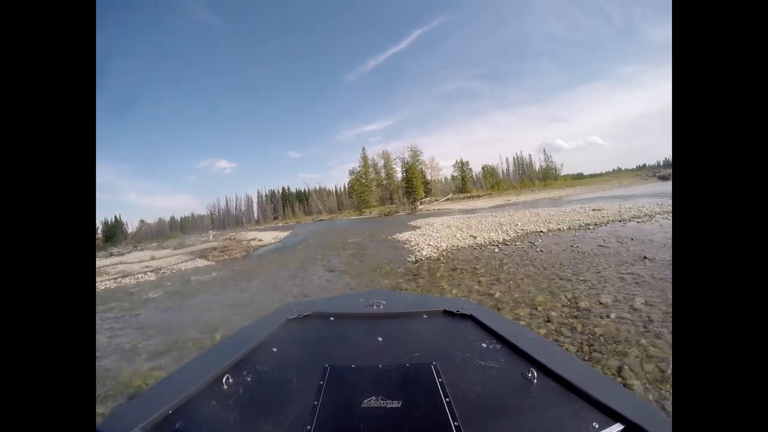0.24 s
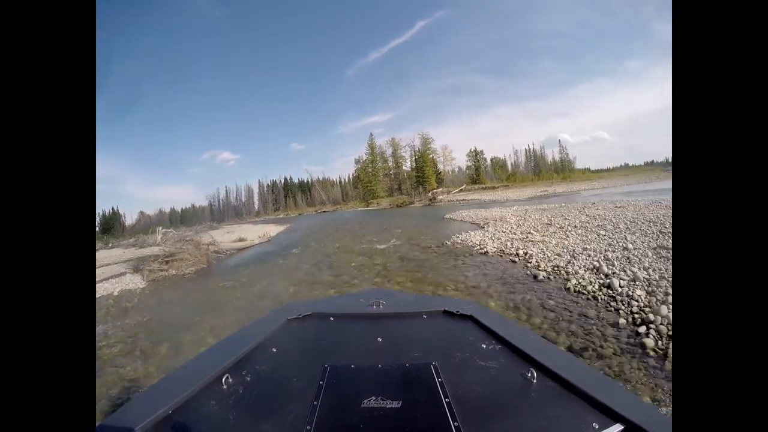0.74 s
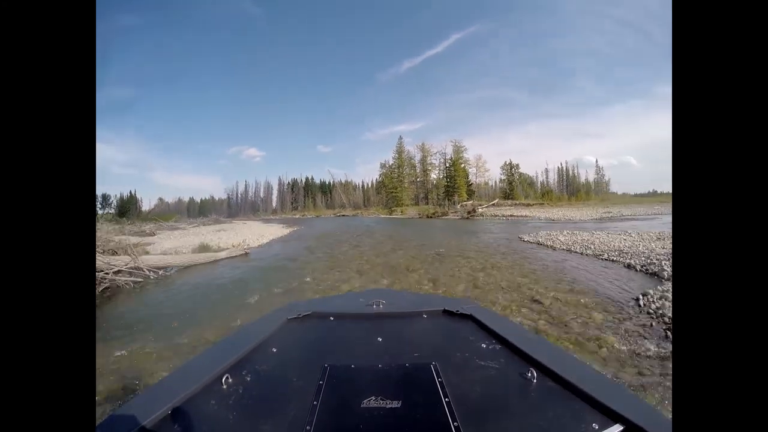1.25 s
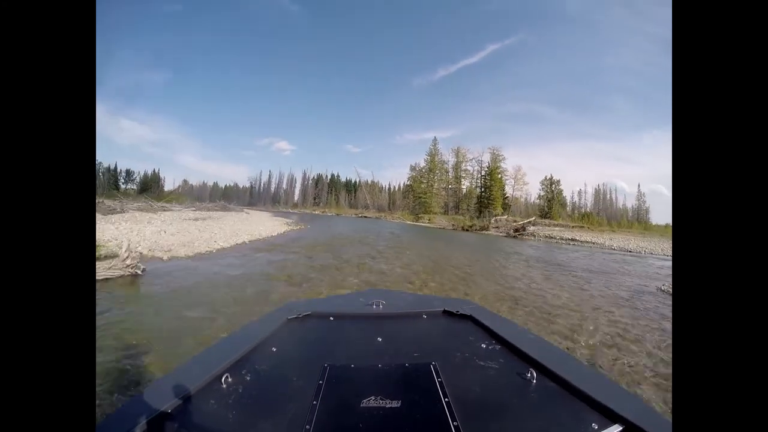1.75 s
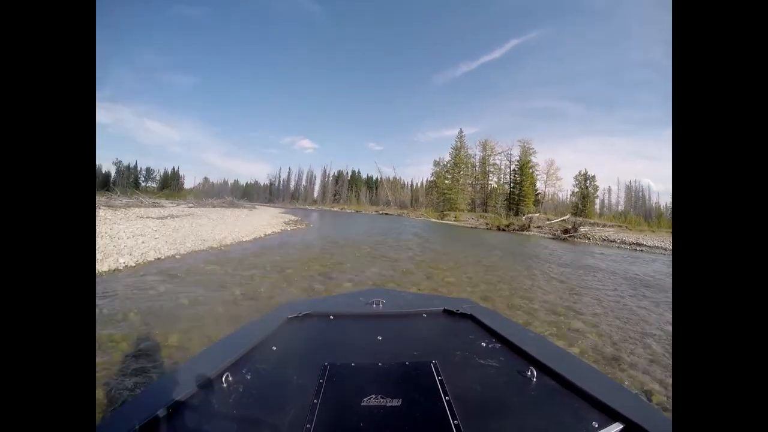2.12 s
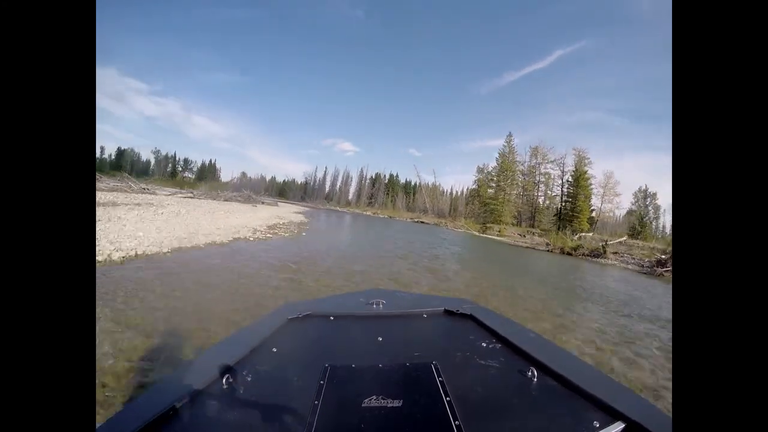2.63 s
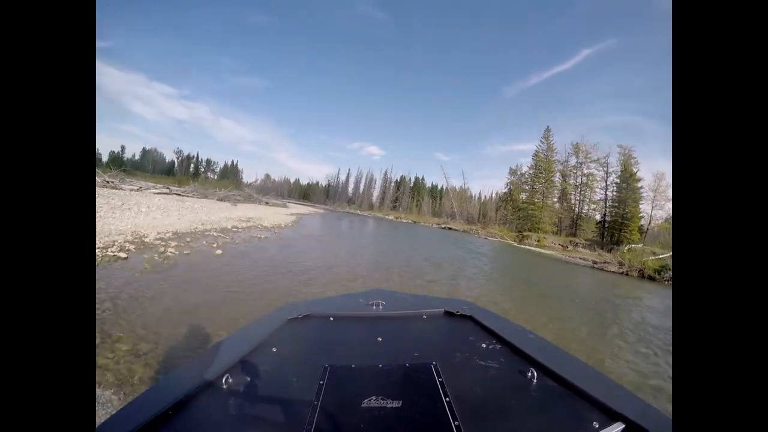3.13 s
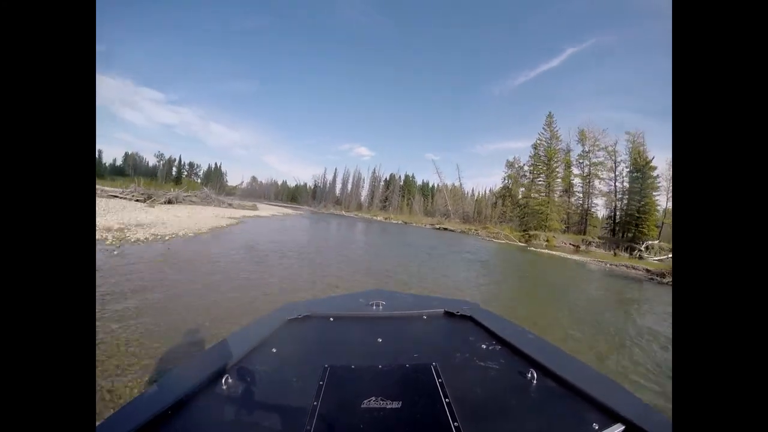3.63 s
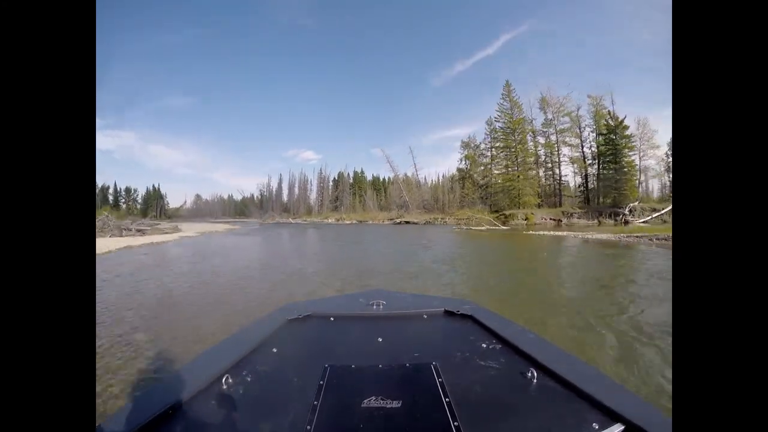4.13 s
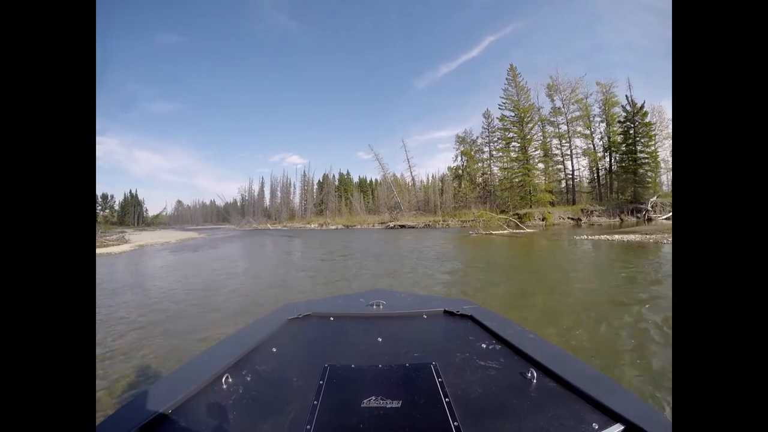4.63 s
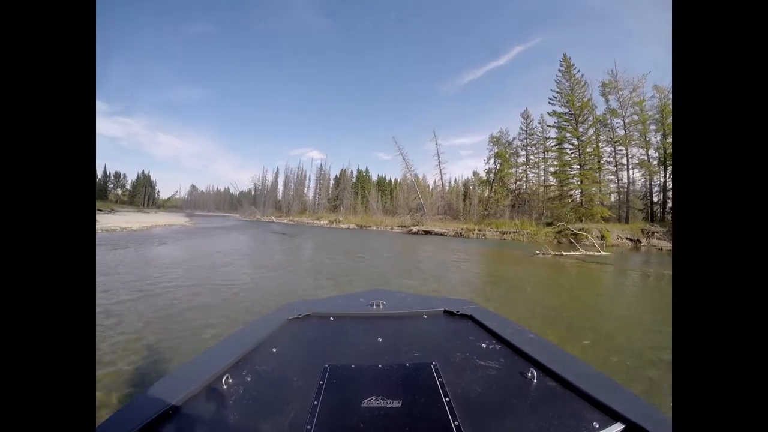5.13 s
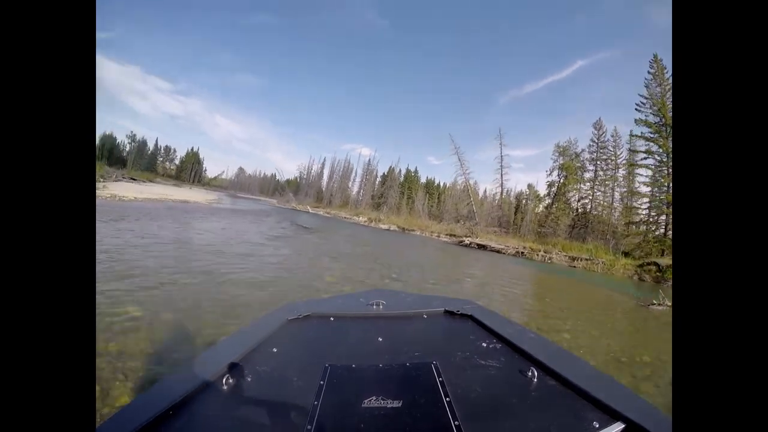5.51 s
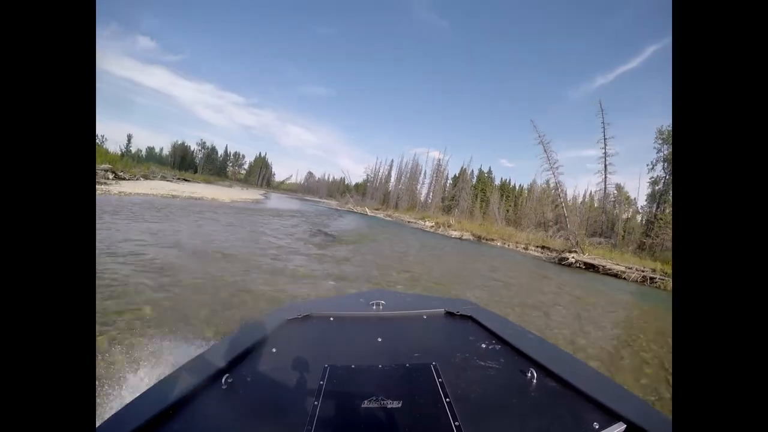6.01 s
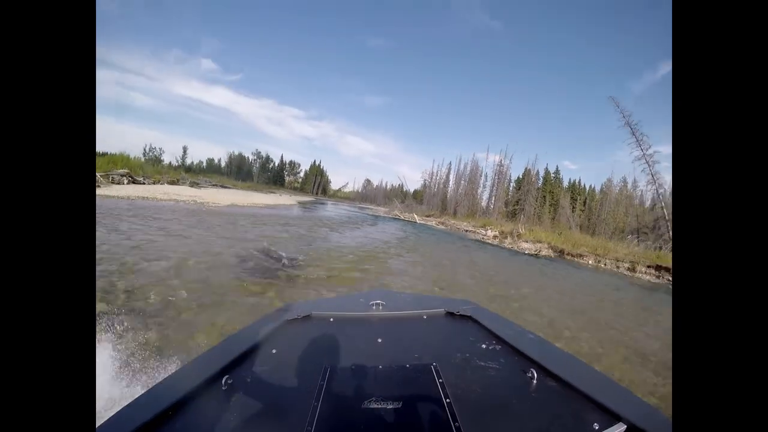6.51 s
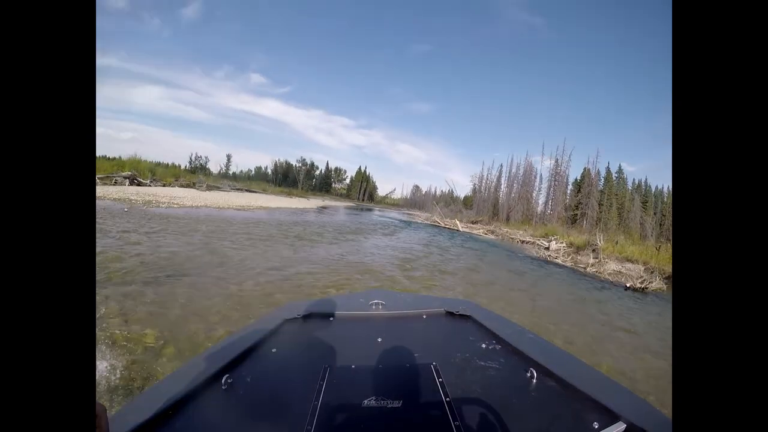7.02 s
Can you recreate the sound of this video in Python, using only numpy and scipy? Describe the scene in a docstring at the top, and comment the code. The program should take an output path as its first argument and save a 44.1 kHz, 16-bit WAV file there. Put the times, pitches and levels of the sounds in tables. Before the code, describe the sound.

A microphone riding in the boat, exposed to wind, hears a hard-working supercharged engine: booming exhaust, gritty mid-range growl and faint high whine. The pitch swoops down and up repeatedly with the throttle, turning rough and gurgling when slow, with short throaty gulps. Dull hull thumps cluster early, a sharp slap bursts into spray, and steady water rush and low fluttering air continue throughout.

```python
"""Seven seconds aboard a small jet boat running up a shallow river, its three-cylinder engine supercharged.
It opens fast, with the exhaust orders booming in the hull, cycle-locked knocks and pulsed gas noise snarling
in the engine bay, and blade tones whining. The revs sink twice by 1.4 s while waves ring the hull, then climb;
the hardest slap and splash come just before 2 s. They drop again near 4 and 4.8 s as swept sines gulp, peak
near 5.8 s, dip and recover. Noise makes the rush and spray, and loose low eddies the buffeting, throughout."""
import sys
import numpy as np
from scipy import signal
from scipy.fft import rfft, irfft, next_fast_len
from scipy.io import wavfile
from scipy.ndimage import uniform_filter1d, minimum_filter1d

SR = 44100
rng = np.random.default_rng(int(sys.argv[2]) if len(sys.argv) > 2 else 0)


def waveform_to_disk(signal):
    """Save audio, clipped to [-1, 1], as 16-bit WAV at the path in sys.argv[1]."""
    frames = np.transpose(np.atleast_2d(signal))
    scaled = np.clip(frames, -1, 1) * 32767
    samples = np.round(scaled).astype(np.int16)
    wavfile.write(sys.argv[1], SR, samples)


N = 320607
TIME = np.arange(N) / SR


def undb(db):
    """Decibels to gain."""
    return np.exp(np.asarray(db) * (np.log(10) / 20))


def unit(x):
    """Scale to rms 1."""
    return x / np.sqrt(np.mean(x ** 2))


def curves(table):
    """Each column after the time as a value per sample."""
    times, *columns = np.transpose(table)
    return [np.interp(TIME, times, column) for column in columns]


def response(hz, points):
    """Gain of a colour at the given frequencies, read on a log-frequency scale."""
    point_hz, db = np.transpose(points)
    return undb(np.interp(np.log(np.maximum(hz, 1)), np.log(point_hz), db))


def colour(x, points):
    """Filter a sound by a colour; rms 1."""
    size = next_fast_len(len(x) + 4096)
    bin_hz = np.arange(size // 2 + 1) * SR / size
    filtered = irfft(rfft(x, size) * response(bin_hz, points), size)
    return unit(filtered[:len(x)])


def noise():
    """White noise for the whole scene."""
    return rng.standard_normal(N)


def walk(rate):
    """Smooth chance with spread 1 that changes rate times a second, repeating after 4096 steps."""
    levels = np.resize(rng.standard_normal(4096), int(TIME[-1] * rate) + 2)
    place = TIME * rate
    k = place.astype(int)
    # an equal-power turn from one level to the next keeps the spread constant
    turn = (np.pi / 2 * (place - k)).astype(np.float32)
    return levels[k] * np.cos(turn) + levels[k + 1] * np.sin(turn)


def add(out, s, sound, db):
    """Put a sound in at time s with the given peak level."""
    i = int(s * SR)
    out[i:i + len(sound)] += (undb(db) * sound / np.abs(sound).max())[:N - i]


# exhaust orders before the hull colours them: (multiple of cycle rate, level [dB])
EXHAUST_ORDERS = [(2, 1.5), (3, -1.5), (4, -2), (5, -15), (6, -9.5), (7, -22.5), (8, -15), (9, -12)]
# the hull's boom resonance: (frequency [Hz], level [dB])
BOOM_COLOUR = [(20, -55.5), (50, -32), (80, -20.5), (110, -11), (135, 1), (152, 5.5), (175, -7),
               (205, -3.5), (235, -12.5), (290, -14.5), (350, -39), (600, -62), (3000, -100)]
# exhaust boom at cruising speed: (time [s], level [dB])
BOOM_LEVEL = [(0.0, -18.5), (0.52, -18.5), (0.94, -12.5), (1.13, -25), (1.22, -15.5), (2.18, -20.5),
              (3.35, -13.0), (3.46, -24), (3.82, -13), (3.9, -18), (4.07, -12.5), (4.34, -16), (4.5, -7),
              (4.59, -15.5), (4.95, -19.5), (5.04, -9), (5.15, -16), (5.76, -10.5), (6.21, -19), (6.42, -9),
              (6.65, -19.5), (7.26, -16.5)]
BOOM_OCTAVE_DB = 5.5  # dB per octave of engine speed


def exhaust(hz, phase, rough, octaves, flutter_rate=40, burble_db=-7, throb_db=1, heave_db=0.2, focus=1.077):
    """Low engine orders sweep through the hull's boom; churning water shakes each one and adds a burble."""
    note, power = 0, 0
    steady = np.sqrt(2 * (1 - rough ** 2))
    for order, db in EXHAUST_ORDERS:
        # focus steepens the boom, so the order nearest the resonance dominates
        size = undb(db) * response(order * hz, BOOM_COLOUR) ** focus
        angle = order * phase + rng.uniform(0, 2 * np.pi)
        in_step = steady + rough * walk(flutter_rate)
        across = rough * walk(flutter_rate)
        note = note + size * (in_step * np.cos(angle) + across * np.sin(angle))
        power = power + size ** 2
    burble = undb(burble_db) * rough * colour(noise(), BOOM_COLOUR)
    note = note / np.sqrt(power) + burble
    # the orders trade energy while the total throbs, and heaves with the churning water
    smooth_power = uniform_filter1d(uniform_filter1d(note ** 2, size=3000), size=2000)
    throb = undb(throb_db * walk(45) + heave_db * rough * walk(14))
    level = undb(curves(BOOM_LEVEL)[0] + BOOM_OCTAVE_DB * octaves)
    return note / np.sqrt(smooth_power) * throb * level


# engine bay's low resonances: (frequency [Hz], level [dB])
BAY_COLOUR = [(100, -49), (250, -8.5), (350, -24), (465, -11), (510, -11), (585, -7.5), (640, -11.5),
              (740, -10), (800, -4), (855, 3.5), (930, -0.5), (1020, -3), (1080, -6.5), (1137, -3.5),
              (1270, -13), (1440, -24), (2000, -27.5), (6000, -95.5)]
# engine's biting upper resonances: (frequency [Hz], level [dB])
BITE_COLOUR = [(1100, -35), (1440, -20), (1580, -1), (1690, -7), (1810, 2.5), (1895, 4), (1970, -7),
               (2060, -17), (2250, -15), (2700, -22), (3050, -28.5), (4500, -54.5), (9000, -81)]


def snarl(phase, rough, drift_rate=9, gas_db=-1, churn_db=7, pulsing=0.31, throb_db=1.14,
          stagger=0.021, firing_db=2, count=72):
    """Knocks that repeat every cycle, a little early or late, and gas noise pulsed by the three firings."""
    size = 2048  # points in one engine cycle
    place = (phase + stagger * walk(40)) / (2 * np.pi) * size
    k = np.arange(count)
    # orders start at the sixth; every third is a multiple of the firing rate
    order_sizes = (k > 5) * undb(firing_db * (k % 3 == 0))
    knocks, power = 0, 0
    # one fixed pattern and three drifting ones: the cycle slowly changes shape
    for weight in (1, walk(drift_rate), walk(drift_rate), walk(drift_rate)):
        orders = order_sizes * np.exp(2j * np.pi * rng.random(count))
        cycle = irfft(orders, size)
        knocks = knocks + weight * np.interp(place % size, np.arange(size), cycle)
        power = power + weight ** 2
    knocks = knocks / np.sqrt(power)
    gas = noise() * (1 + pulsing * np.cos(3 * phase))
    gas_share = undb(gas_db + churn_db * (rough - .5))
    throb = undb(throb_db * walk(70)) / np.hypot(1, gas_share)
    bay, bite = [unit((colour(knocks, points) + gas_share * colour(gas, points)) * throb)
                 for points in (BAY_COLOUR, BITE_COLOUR)]
    return bay, bite


# whine by pitch, before trims and flares: (tone [Hz], level [dB], smear [0-1])
WHINE_BY_PITCH = [(3800, -66, 1), (4940, -61.5, .95), (5900, -54.5, 1), (7100, -52.5, .95),
                  (7900, -50, 0.99), (7930, -48, 1), (8560, -57.5, 0.4), (9900, -63.5, 0.2),
                  (14000, -65, 0.95)]
# the treble comes through the housing unevenly: (frequency [Hz], level [dB])
HOUSING_COLOUR = [(5000, 0), (5600, -4.5), (6300, -6), (6880, 8), (7200, 0.5), (7550, 5.5), (7800, -5.5),
                  (8100, 0.5), (8500, -8.5), (9000, -2), (10000, -4)]
WHINE_ORDER = 173  # blade tone as a multiple of the cycle rate
WHINE_REV_DB = 2.3  # dB per octave a second of revving up
FLARE_DB, FLARE_SMEAR = 1, .15  # dB and added smear per octave a second of slowing


def supercharger(hz, phase, revving, wobble_rate=700, wobble=.024, rock=0.02, flutter_db=1.0,
                 tone_db=-5.0, octave_db=-21):
    """Impeller blades whine with a faint octave; twist in the drive smears the tone, more so on slowing."""
    table_hz, levels, smears = np.transpose(WHINE_BY_PITCH)
    tone_hz = WHINE_ORDER * hz
    slowing = np.maximum(-revving, 0)
    smear = np.interp(tone_hz, table_hz, smears) + FLARE_SMEAR * slowing
    twist = wobble * walk(wobble_rate) + rock * np.sin(3 * phase)
    angle = 2 * np.pi * np.cumsum(tone_hz * (1 + smear * twist)) / SR
    whine = 0
    for k, db in ((1, tone_db), (2, octave_db)):
        tone = np.sin(k * angle) * (1 + 0.24 * walk(300)) * undb(flutter_db * walk(32))
        level_db = db + np.interp(k * tone_hz, table_hz, levels)
        whine = whine + colour(tone, HOUSING_COLOUR) * undb(level_db)
    return whine * undb(WHINE_REV_DB * np.maximum(revving, 0) + FLARE_DB * slowing)


# the exhaust gulps as its outlet comes clear of the water:
# (middle time [s], middle pitch [Hz], peak level [dB], length [s])
GULPS = [(.68, 228, -24, 0.12), (4.044, 250, -22, 0.066), (4.118, 268, -19.5, .11),
         (4.556, 266.6, -25, 0.084), (4.82, 282.3, -25.5, .1), (5.272, 266.7, -24.5, 0.22)]


def gulps(rise=0.2):
    """Short throaty swells: sines under a half-sine envelope that rise a little and waver in pitch."""
    out = np.zeros(N)
    for s, hz, db, length in GULPS:
        u = np.linspace(0, 1, int(length * SR))
        pitch = hz * (1 + rise * (u - .5) + 0.039 * walk(87.0)[:len(u)])
        swell = np.sin(np.pi * u) * np.sin(2 * np.pi * np.cumsum(pitch) / SR)
        add(out, s - length / 2, swell, db)
    return out


# waves thump the hull bottom: (time [s], peak level [dB])
THUMPS = [(0.601, -9.5), (.8, -3.5), (0.965, -5.5), (1.227, -11), (1.418, -13), (1.527, -4.5), (1.72, -11),
          (1.95, -5), (2.516, -8), (3.325, -6.5), (4.26, -7), (6.602, -4), (6.803, -5.5)]
# sharp slaps on the hull plates: (time [s], peak level [dB], 60 dB decay [s])
SLAPS = [(.72, -20, 0.035), (1.419, -17, 0.095), (1.53, -15, 0.12), (1.924, 2.5, 0.12),
         (1.953, -11.5, 0.085), (3.579, -12.5, .04), (4.263, -13, 0.027), (6.589, -9.5, .08)]
# hull modes: (frequency [Hz], level [dB], 60 dB decay [s])
HULL_MODES = [(129, -18, 0.29), (140.9, 2.5, 0.21), (163, -1.5, 0.02), (260, -33, 0.035)]
# rattle of the hull plates: (frequency [Hz], level [dB])
PLATE_COLOUR = [(30, -36.5), (100, 12), (270, 4), (370, -9), (520, 6), (640, -4.5), (760, 7.5), (900, 7),
                (1100, 0.5), (1350, -12.5), (2000, -11), (2600, -25.5), (3300, -23.5), (5000, -43.5),
                (12000, -79.5)]


def hull(rise_s=0.0069, contact_s=0.0004):
    """Soft blows ring the hull's low modes; hard slaps rattle its plates."""
    out = np.zeros(N)
    t = TIME[:SR // 3]
    ring = sum(undb(db - 60 * t / t60) * np.sin(2 * np.pi * f * t) for f, db, t60 in HULL_MODES)
    thump = -ring * (1 - np.exp(-t / rise_s))
    for s, db in THUMPS:
        add(out, s, thump, db)
    for s, db, t60 in SLAPS:
        rattle = colour(rng.standard_normal(len(t)), PLATE_COLOUR)
        # the plates share out the blow's energy
        rattle = rattle / np.sqrt(uniform_filter1d(rattle ** 2, size=700))
        add(out, s, rattle * (1 - np.exp(-t / contact_s)) * undb(-60 * t / t60), db)
    return out


# water rushing along the hull: (frequency [Hz], level [dB])
RUSH_COLOUR = [(40, -26), (100, -12.5), (600, 2.5), (1500, -2), (2080, -5), (2300, -1.5), (2700, -3.5),
               (3050, 5), (3300, -0.5), (3600, 1.5), (3900, -6.5), (4090, -2.5), (4300, -10.5), (4550, -9),
               (4800, -16.5), (5200, -16.5), (5600, -20.5), (6200, -17), (6850, -17), (7300, -20),
               (7950, -23), (8600, -32), (15000, -47)]
# the rush swells, or once dips, as the hull digs in:
# (middle time [s], half length [s], level over the rush [dB])
SURGES = [(0.437, 0.08, 6), (4.034, .06, 7), (4.42, 0.078, -2.5), (5.14, 0.076, 4)]
# fine drops: (frequency [Hz], level [dB])
SPRAY_COLOUR = [(2000, -18), (5000, 1), (7500, 7), (9000, -6), (10700, 1.5), (12000, -5.5), (13500, 1),
                (15000, -8.5)]
# fine spray before the drops_db lift: (time [s], level [dB])
SPRAY_LEVEL = [(0.1, -69.5), (1.37, -69.5), (1.45, -64), (1.75, -77), (2.47, -63), (2.73, -67.5),
               (4.56, -73), (4.77, -79), (5.28, -71), (6.13, -70), (6.52, -65), (7.15, -67)]
# sheets of spray thrown up by the hull: (time [s], level over the fine spray [dB])
SPLASHES = [(.86, 4), (1.43, 2), (1.965, 9), (2.05, 3), (2.86, 1), (6.77, 4)]
SPLASH_S = .06  # time constant of a splash's fading dB lift


def water(rush_db, flicker_db=1.16, drops_db=5, patter_db=1):
    """A rush of noise along the hull, and sparse random drops of spray that leap with each splash."""
    surge_db = sum(db * np.exp(-((TIME - s) / half) ** 2) for s, half, db in SURGES)
    rush = colour(noise(), RUSH_COLOUR) * undb(rush_db + surge_db + flicker_db * walk(22))
    splash_db = sum(db * (TIME > s) * np.exp(-np.abs(TIME - s) / SPLASH_S) for s, db in SPLASHES)
    drops = noise() * (rng.random(N) < .2) * rng.rayleigh(size=N)
    spray_db = curves(SPRAY_LEVEL)[0] + splash_db + drops_db + patter_db * walk(48)
    return rush + colour(drops, SPRAY_COLOUR) * undb(spray_db)


# turbulence in the air stream: (frequency [Hz], level [dB])
BUFFET_COLOUR = [(3, -65), (10, -27.5), (18, -16.5), (26, -7.5), (33, -6.5), (45, -17.5), (65, -22.5),
                 (120, -37), (400, -91.5), (2000, -120)]
# buffeting air before its quick gusts: (time [s], level [dB])
WIND_LEVEL = [(0.0, -20), (0.9, -14.5), (0.96, -25), (1.48, -16.5), (1.78, -27), (1.88, -14.5), (2.36, -16),
              (2.5, -25.5), (2.88, -14), (2.98, -24), (4.22, -18.5), (4.38, -29.5), (4.82, -32),
              (4.92, -19), (6.26, -33), (6.78, -13.5), (7.06, -27), (7.26, -16)]


def wind(shed_hz=26.07, wander=0.093, turbulence_db=-6, gust_db=2):
    """Eddies shed at a loose rate thud close by amid broader turbulence, in quick gusts."""
    eddies = np.sin(2 * np.pi * np.cumsum(shed_hz * (1 + wander * walk(11))) / SR)
    turbulence = undb(turbulence_db) * colour(noise(), BUFFET_COLOUR)
    return unit(unit(eddies) + turbulence) * undb(curves(WIND_LEVEL)[0] + gust_db * walk(9))


# engine speed before smoothing: (time [s], four-stroke cycle rate [Hz])
SPEED = [(0.0, 57.74), (0.32, 55.42), (0.47, 36.4), (0.57, 30.33), (0.67, 28.13), (0.87, 38.3),
         (1.01, 40.59), (1.17, 28.2), (1.36, 21.7), (1.52, 23.83), (1.66, 28.99), (2.09, 38.29),
         (2.76, 44.74), (2.91, 41.34), (3.36, 38.25), (3.64, 45.88), (3.87, 33.12), (4.02, 28.08),
         (4.14, 31.33), (4.4, 47.03), (4.52, 46.1), (4.77, 31.69), (4.88, 31.57), (5.24, 44.28),
         (5.77, 51.63), (6.12, 49.48), (6.3, 38.83), (6.45, 37.88), (6.64, 44.04), (6.88, 45.8),
         (7.27, 43.47)]
# levels at cruising speed as the boat turns and trims:
# (time [s], engine snarl [dB], its upper bite [dB], water rush [dB])
LEVELS = [(0.0, -20.5, -33.5, -39.5), (0.63, -21.5, -35, -39.5), (0.74, -21, -30.5, -38.5),
          (1.08, -23, -34.5, -41.5), (1.17, -20, -32.5, -38.5), (1.3, -27.5, -35.5, -41.5),
          (1.4, -24.5, -33, -38), (1.62, -29, -36.5, -39), (2.2, -25, -37, -41.5),
          (2.96, -23.5, -34.5, -40.0), (3.04, -22, -29.5, -38.5), (3.55, -23.5, -31.5, -40.5),
          (3.89, -21.0, -28.5, -35.5), (4.01, -25, -35, -39.5), (4.47, -20, -29.5, -32.5),
          (4.55, -22.0, -32.5, -39.5), (5.46, -19.5, -31, -36.5), (5.94, -25.5, -34.5, -43.5),
          (6.31, -22.0, -36, -44), (7.26, -24.5, -36.5, -40.5)]
CRUISE_HZ = 40  # engine cycles per second
# dB per octave of speed, and dB per octave a second of revving up
SNARL_OCTAVE_DB, SNARL_REV_DB = 8, 0.93
BITE_OCTAVE_DB, BITE_REV_DB = 8.5, 0.87
RUSH_OCTAVE_DB, RUSH_REV_DB = 5.5, 0.6
# water closes over the exhaust outlet at low speed and breaks up the note: roughness, fall per octave
CHURN_AT_CRUISE, CHURN_PER_OCTAVE = 0.55, 0.58


def scene():
    """Engine, supercharger, river and air; the engine's speed drives pitch, level and roughness."""
    # the flywheel rounds each change
    hz = uniform_filter1d(curves(SPEED)[0], size=3900, mode="nearest")
    phase = 2 * np.pi * np.cumsum(hz * (1 + 0.00239 * walk(30))) / SR
    octaves = np.log2(hz / CRUISE_HZ)
    revving = uniform_filter1d(np.gradient(octaves) * SR, size=4400)  # octaves a second
    rough = np.clip(CHURN_AT_CRUISE - CHURN_PER_OCTAVE * octaves, .24, .9)
    snarl_db, bite_db, rush_db = curves(LEVELS)
    snarl_db = snarl_db + SNARL_OCTAVE_DB * octaves + SNARL_REV_DB * revving
    bite_db = bite_db + BITE_OCTAVE_DB * octaves + BITE_REV_DB * revving
    rush_db = rush_db + RUSH_OCTAVE_DB * octaves + RUSH_REV_DB * revving
    bay, bite = snarl(phase, rough)
    engine = exhaust(hz, phase, rough, octaves) + bay * undb(snarl_db) + bite * undb(bite_db)
    engine = engine + supercharger(hz, phase, revving) + gulps()
    river = hull() + water(rush_db)
    return (engine + river + wind())[None]


TOP_HZ = 15100


def record(dry):
    """A smoothed gain turns down the loudest peaks, and a steep low-pass cuts the top."""
    headroom = np.minimum(1, .9 / (np.abs(dry) + 1e-9))
    gain = uniform_filter1d(minimum_filter1d(headroom, size=400), size=400)
    top_cut = signal.ellip(8, .2, 70, TOP_HZ, fs=SR, output="sos")
    return signal.sosfilt(top_cut, dry * gain)


dry = scene()
out = record(dry)
waveform_to_disk(out)
```